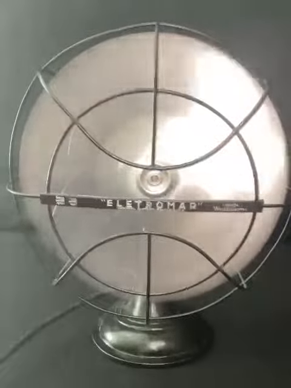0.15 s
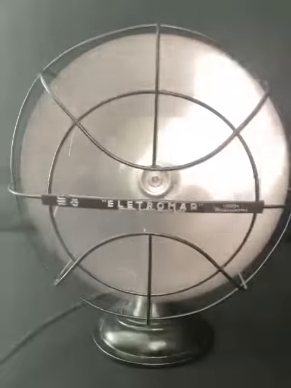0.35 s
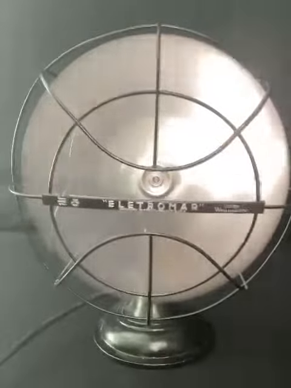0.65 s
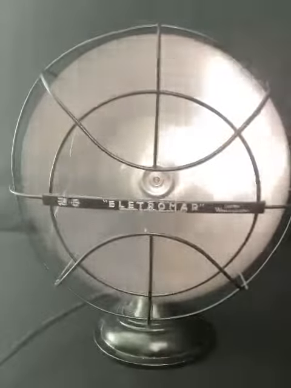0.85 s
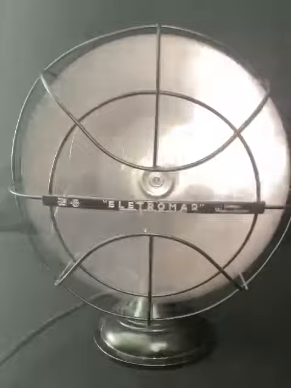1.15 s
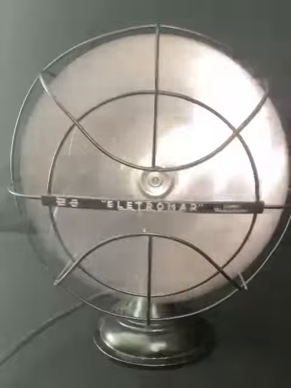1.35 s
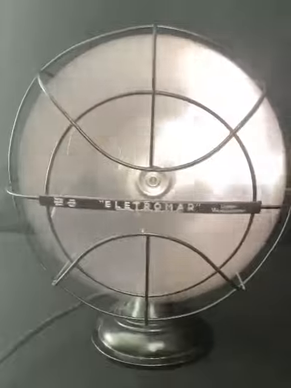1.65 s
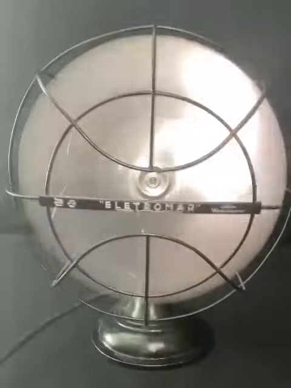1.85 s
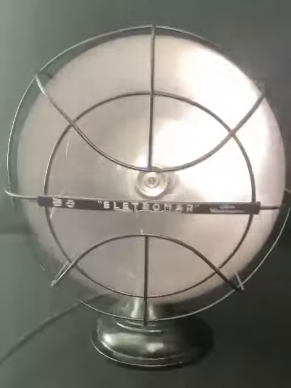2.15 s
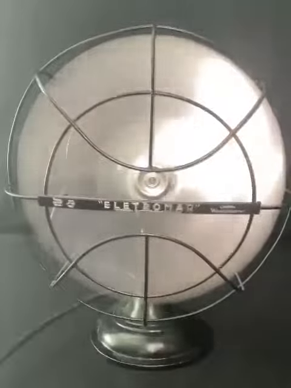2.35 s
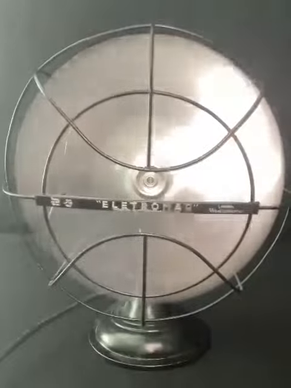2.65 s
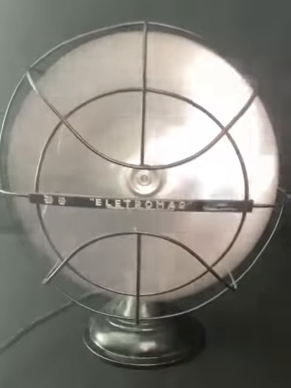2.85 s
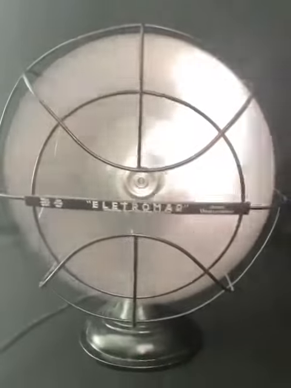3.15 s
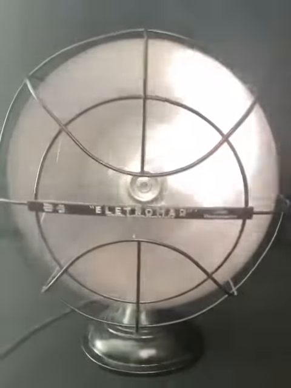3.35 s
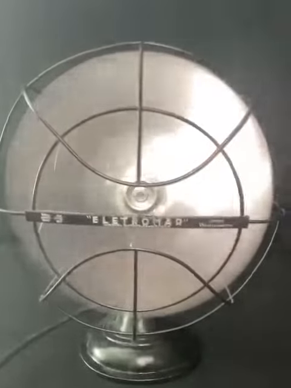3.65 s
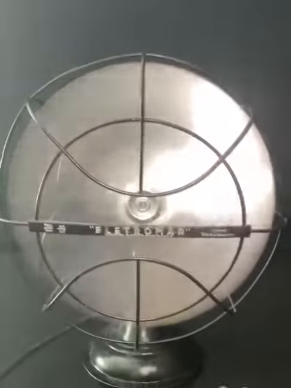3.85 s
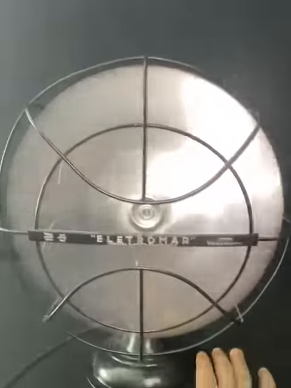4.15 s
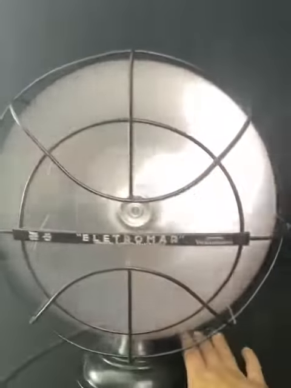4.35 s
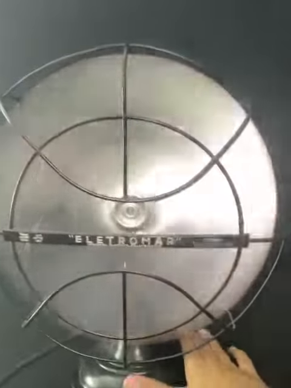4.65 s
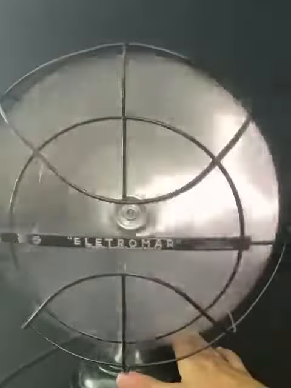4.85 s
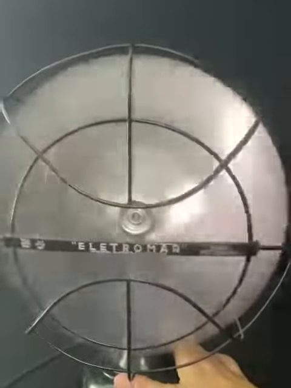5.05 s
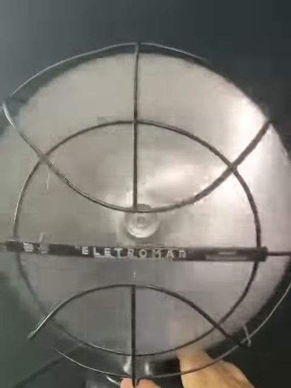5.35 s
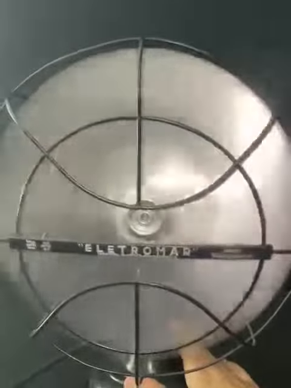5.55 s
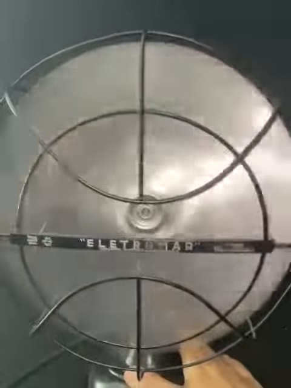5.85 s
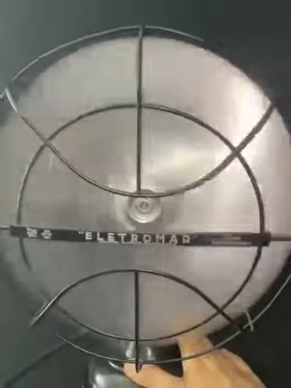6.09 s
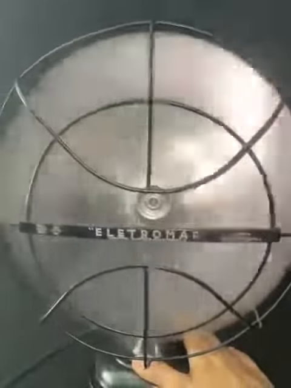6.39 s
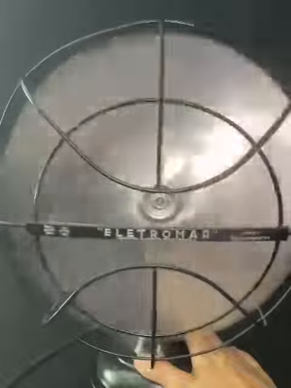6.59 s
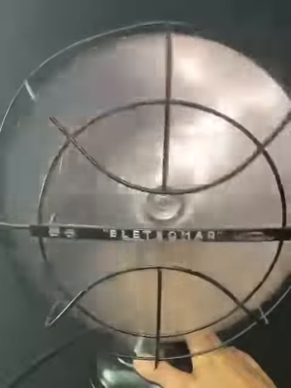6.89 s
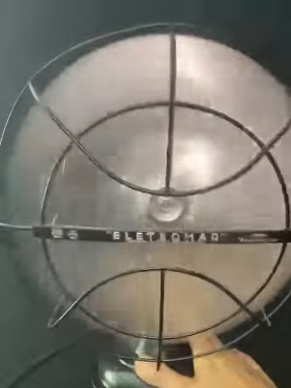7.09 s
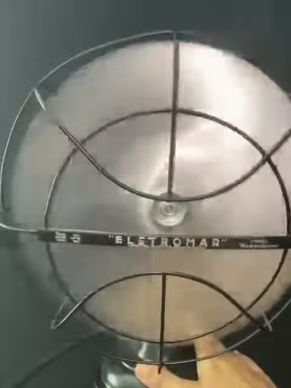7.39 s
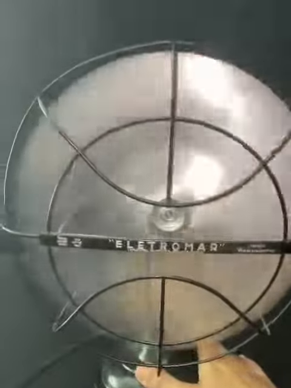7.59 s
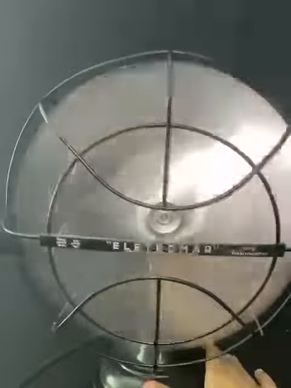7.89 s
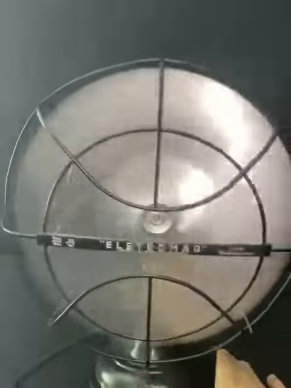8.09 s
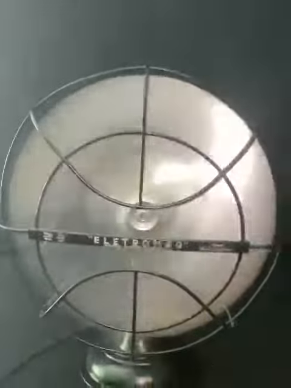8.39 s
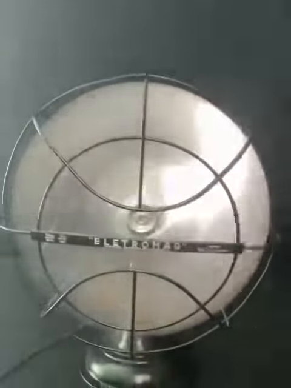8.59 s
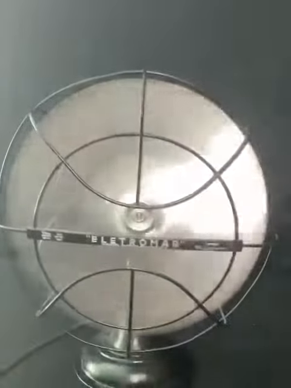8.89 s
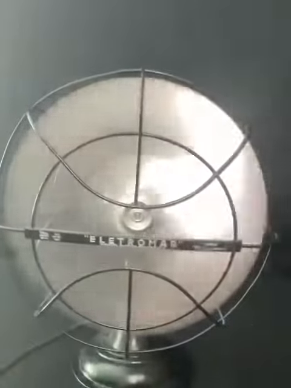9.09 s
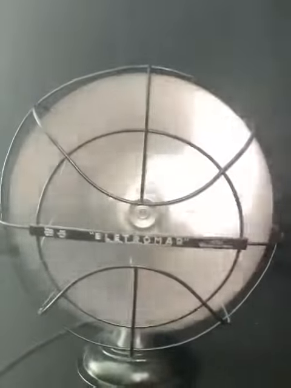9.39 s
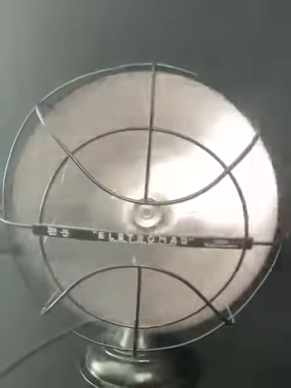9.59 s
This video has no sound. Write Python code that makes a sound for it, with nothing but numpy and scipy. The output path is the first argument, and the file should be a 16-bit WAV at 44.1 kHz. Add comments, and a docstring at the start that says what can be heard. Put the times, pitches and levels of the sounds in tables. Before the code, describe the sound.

An old metal desk fan drones and rattles close up, its wire guard ringing, then is switched off and coasts down, scraping more softly.

```python
"""In a small room, an old metal desk fan runs close to a stereo microphone, is switched off after six seconds and coasts.
Its unbalanced rotor shakes the frame in sine lines at multiples of the shaft rate, beside a magnetic drone.
The wire guard sings in wavering modes and rattles in bouts of noise; the dry bearing scrapes once a turn.
Air rushes off the blades as coloured noise, and its draught buffets the microphone in rumble and single puffs."""
import sys
import numpy as np
from scipy import signal
from scipy.fft import rfft, irfft, next_fast_len
from scipy.io import wavfile
from scipy.ndimage import uniform_filter1d

SR = 44100
rng = np.random.default_rng(int(sys.argv[2]) if len(sys.argv) > 2 else 0)


def dump(signal):
    """Clip the signal to [-1, 1] and save it as 16-bit WAV at the path in sys.argv[1]."""
    limited = np.clip(np.atleast_2d(signal).T, -1, 1)
    pcm = np.round(limited * 32767).astype(np.int16)
    wavfile.write(sys.argv[1], SR, pcm)


N = 429093
TIME = np.arange(N) / SR

# rotor speed: (time [s], speed [turns/s])
SPEED = [(0.0, 40.005), (1.0, 40.317), (1.5, 40.541), (2.2, 40.632), (3.4, 40.868), (4.6, 40.947),
         (5.5, 40.935), (6.1, 40.853), (6.3, 39.698), (6.6, 37.611), (7.0, 36.208), (7.5, 33.568),
         (8.0, 31.492), (8.5, 29.54), (9.0, 28.445), (9.73, 25.859)]
# the stand's response to the throb at twice the shaft rate: (frequency [Hz], level [dB])
THROB = [(52, -48), (60.5, -51), (62.6, -33), (64.8, -29.5), (68, -32), (72, -32.5), (82, -36.5)]
# resonances of the body: (frequency [Hz], width [Hz], level before the order strengths [dB])
BODY = [(39.6, 4, -39.6), (86, 7, -43), (114.7, 3.6, -36.5), (149.9, 15, -35.5), (197, 5, -33),
        (216.9, 6, -32.3), (244.5, 16, -32), (291, 6, -37.5), (327, 24, -47.3), (362.8, 10.5, -37.5),
        (397.5, 15.8, -43), (424.9, 11.4, -39), (468.3, 10.5, -43), (516.5, 11, -28.5),
        (602.8, 11.6, -41.6)]
# strength of the unbalance at multiples of the shaft rate: (multiple [1], relative level [dB])
ORDERS = [(1, 0), (3, 6.5), (4, -1), (5, 1), (6, -3.5), (7, -4), (8, -.5), (9, -1.5), (12, -1), (13, -3.5),
          (14, 1.5), (19, 1.5)]
# the motor's magnetic pull pulses at twice the mains rate
PULL_HZ = 120
# the motor's drive ends here and dies away with this time constant
DRIVE_ENDS_S, DRIVE_FADE_S = 6.31, 0.22
# level of the frame's drone: (time [s], level [dB])
DRONE = [(0, -25.5), (.95, -30), (1.1, -31), (1.8, -29), (5.3, -27.5), (5.7, -25.5), (6.3, -28.5)]
# drone lines, the pull shifted up by 0, 1 and 2 times the shaft rate: (relative level [dB])
DRONE_LINES = [-19, -16, 0.3]
# a hand steadies the base: (time [s], grip [0-1])
HAND = [(0, 0), (4.1, 0.05), (4.5, 0.81), (7.2, 1), (8.1, 0.2)]
# overall shaking of the guard: (time [s], singing [dB], rattle [dB]), before bouts and trims
SHAKING = [(0, -45, -33), (0.3, -33, -33.5), (0.8, -26.5, -38), (1.15, -25.5, -36), (1.6, -28, -37.5),
           (2.4, -27, -36.5), (3.2, -25, -33.5), (3.65, -29, -34), (3.9, -21, -31.5), (4.12, -21.5, -35.5),
           (4.3, -20, -33), (4.7, -23, -32.5), (5.05, -17, -34), (5.45, -23, -30.5), (5.75, -22, -30.5),
           (5.95, -22, -34.5), (6.15, -22, -29), (6.3, -27, -33), (6.45, -27, -33.5), (6.85, -29.5, -38),
           (7.2, -35.5, -40), (7.6, -41, -43), (8.55, -65, -46), (9.15, -52, -44.5), (9.73, -58, -49)]
# one bout of shaking, a slow beat of shaft against pull: (share of the beat [0-1], singing [dB], rattle [dB])
BOUT = [(0, -4.5, .8), (.1, -1.5, 2.2), (.25, 0.3, 1.2), (.6, 0.8, -1), (.78, -1.5, -2.6),
        (.92, -5.5, -1.8), (1, -4.5, .8)]
# singing modes of the guard: (pitch [Hz])
SINGING_HZ = [441, 512, 522.7, 542, 603, 605.5, 651, 848, 1054, 1129.5, 1168, 1211, 1686, 1714, 2390, 2592,
              2645, 2729]
# the same modes: (relative level [dB], share driven by singing rather than rattle [0-1],
# pitch wander [Hz], change under the hand [dB])
SINGING = [(-21.5, 0.72, 2.3, -3.5), (-18, 0.9, 5.07, 9.5), (0.5, 0.99, 1.582, -0.5),
           (-16.5, 0.36, 4.985, 8.5), (-13, 0.75, 1.52, 0.5), (-13, 0.65, 1.52, 0), (-19, 0.54, 1.88, -13),
           (-24.5, 0.25, 1.51, -11), (-16, 0.071, 1.09, -6), (-29, 0.66, 1.1, 14), (-27, 0.15, 2.37, -2),
           (-29.5, 0.6, 1.6, 10.5), (-21, 0.49, 2, 1), (-23.5, 0, 1.96, 3), (-19, 0.14, 3, -8),
           (-23.5, 0.67, 2.92, -7), (-26, 0.2, 3.03, -7), (-30.5, 0, 3.6, -1)]
# how the singing leans to one side: (time [s], left minus right [dB])
LEAN = [(3.3, -1.5), (4.3, 2.5), (6.3, 2), (8, 0.5)]
# chatter of the guard, a knock and its rebound: (share of the turn [0-1], relative level [dB])
CHATTER = [(0, -3.5), (.12, -4), (.16, 1.2), (.27, 3), (.45, -.7), (.6, .7), (.72, -2.5), (1, -3.5)]
# hard knocks of the guard: (time [s], onset level before the knock trim [dB])
KNOCKS = [(1.47, -24.5), (1.4965, -28), (2.135, -25.5), (2.2542, -30), (2.577, -23.5), (2.6264, -21.5),
          (2.6535, -27), (2.6755, -25), (6.0282, -25), (6.079, -27), (6.127, -23)]
# tone of the rattle: (frequency [Hz], density [dB/Hz])
RATTLE = [(450, -18), (620, 2.5), (750, -11), (960, 1), (1200, -3), (1420, -10.5), (1700, -1.5),
          (1850, -7.5), (2080, -2.5), (2230, -5.5), (2600, -2), (2900, -12), (3500, -20.5), (6000, -36)]
# level of the bearing's scrape: (time [s], level before bouts and trim [dB])
SCRAPING = [(0, -37.5), (3.5, -37), (5.6, -36), (7.35, -43.5), (8.05, -39), (8.45, -47.5), (8.8, -48.0),
            (9.05, -42.5), (9.73, -52)]
# pressure on the bearing: (share of the turn [0-1], relative level [dB])
RUB = [(0, -8), (.06, -4), (.13, 3), (.22, -1), (.3, -1.8), (.45, -3.2), (.65, -4.8), (.8, -6.5), (1, -7.2)]
# how much the bearing's strokes deepen as the rotor loses its speed
STROKE_DEEPENING = 1.7
# rings of the bearing housing: (frequency [Hz], width [Hz], level over the scrape [dB])
HOUSING = [(3106, 28, 14.5), (4950, 59, -12), (6140, 220, -2), (6435, 38, 7.5), (6650, 33, -11),
           (8600, 22, 15.5), (11330, 190, 0)]
# tone of the scrape: (frequency [Hz], density [dB/Hz])
SCRAPE = [(1500, -6.5), (3000, -12), (3600, -13.5), (4700, -3.5), (5300, -4.5), (6250, 1), (7200, -5),
          (8100, -5.5), (9200, -4.5), (9900, -6.5), (11200, 0.5), (11700, -18), (12300, -43)]
# stray ticks of the bearing: (time [s], onset level [dB])
TICKS = [(5.757, -36), (5.82, -39), (6.351, -28), (7.07, -27), (7.7455, -30), (7.901, -31), (7.9954, -30),
         (8.0263, -29), (8.756, -37), (9.3294, -36), (9.5479, -45), (9.664, -38)]
# tone of a tick: (frequency [Hz], density [dB/Hz])
TICK = [(1500, -18), (3500, -15), (6000, 6), (8000, 7), (11000, -7), (12300, -22)]
# rings of the rotor's rasp at its critical speed: (frequency [Hz], width [Hz], relative level [dB])
RASP = [(2584, 28, -7), (3230, 100, -13.5)]
# the base rocks and taps the table as the rotor slows: (time [s], peak level [dB])
TAPS = [(6.975, -15), (7.003, -16), (7.031, -20), (7.058, -14.5)]
# air rush: level at full speed before its trim, growth per tenfold speed, extra with a hand in the stream
AIR_DB, AIR_SPEED_DB, AIR_HAND_DB = -35.5, 76.5, 3.5
# tone of the rush: (frequency [Hz], density [dB/Hz])
RUSH = [(40, -7), (100, -0.5), (200, 0), (300, -5), (420, -3.5), (480, 2), (520, 7), (570, 0), (720, -11),
        (1500, -15.5), (4000, -14), (12000, -30.5)]
# draught on the microphone: (time [s], level before gusts and low cut [dB])
DRAUGHT = [(0, -31.5), (.8, -54), (1.6, -42), (2.4, -46), (2.7, -29.5), (3.4, -30), (4.4, -33.5),
           (5.2, -28.5), (5.75, -47), (6.45, -25.5), (6.9, -30.5), (7.4, -34.5), (8.3, -42.5), (8.6, -39),
           (9, -54), (9.73, -47)]
# tone of the draught: (frequency [Hz], density [dB/Hz])
BUFFET = [(15, -31), (30, -31), (45, -3.5), (62, 2), (85, -5.5), (130, -9.5), (200, -9.5), (350, -22),
          (900, -80)]
# single puffs on the microphone: (time [s], peak level before the low cut [dB], pitch [Hz])
PUFFS = [(0.053, -15.5, 79), (0.33, -21, 70), (1.15, -12.5, 95.5), (1.703, -13, 69), (2.648, -18, 69.5),
         (2.762, -12, 67), (2.832, -14, 78), (2.866, -18, 240), (2.888, -14.5, 74), (3.186, -16, 62),
         (3.312, -17, 75), (3.334, -15, 66), (3.392, -15, 70), (3.51, -20, 70), (3.69, -16, 60),
         (4.08, -14, 73), (4.265, -13, 75), (4.551, -15, 82), (4.776, -18, 70), (4.852, -11.5, 64),
         (5.081, -16, 73.4), (5.197, -11.5, 97), (5.49, -12, 95), (6.083, -19, 78), (6.229, -16, 68),
         (6.35, -12, 77), (6.489, -13, 52), (6.875, -17, 97), (8.554, -23, 77), (9.49, -33, 50.4)]
# slow air stirring separately round each port: (time [s], level [dB])
STIRRING = [(0, -65), (2.5, -66), (5.5, -60), (6.7, -61), (8, -33.5), (9, -62), (9.73, -67)]
# tone of the stirring: (frequency [Hz], density [dB/Hz])
STIR = [(15, -12), (30, -6), (70, 5.5), (130, 2), (260, -4), (420, -9), (800, -52)]
# phase between the two microphone ports: (frequency [Hz], left lead [rad])
PORTS = [(20, 0), (400, -.1), (520, -.75), (620, -1.4), (720, -1.2), (800, -.1), (1050, -.3), (1130, .7),
         (1300, -.1), (2200, 0), (2700, -.9), (3400, -2.4), (3900, -2.4), (4200, 1.9), (4600, 1.7),
         (4900, 0), (5500, .1), (6300, 1.8), (7000, 3), (8500, 3.2), (9200, 3.8), (9700, 6.2),
         (11500, 6.28)]
# part of scrape and rush that reaches the two ports unrelated: (frequency [Hz], share [0-1])
STRAY = [(2000, 0), (2600, 0.1), (3000, 0.32), (4500, 0.72), (4950, 0), (5500, 0), (6000, 0.3), (6600, 0),
         (7100, 0), (8300, 0), (9400, 0.16), (10000, 0), (12000, 0)]
# upper edge of the microphone's band
TOP_HZ = 11900


def undb(db):
    """Decibels to gain."""
    return np.exp(np.asarray(db) * (np.log(10) / 20))


def unit(x):
    """Scale to rms 1."""
    return x / np.sqrt(np.mean(x ** 2))


def curves(rows):
    """Each column of a table, joined by straight lines in time."""
    s, *columns = np.transpose(rows)
    return [np.interp(TIME, s, column) for column in columns]


def across(points, hz):
    """Read a spectrum on a log-frequency axis."""
    f, value = np.transpose(points)
    return np.interp(np.log(np.maximum(hz, 1)), np.log(f), value)


def filtered(x, response):
    """Apply a frequency response given as a function of Hz."""
    size = next_fast_len(N + 4096, real=True)
    hz = np.arange(size // 2 + 1) * SR / size
    return irfft(rfft(x, size) * response(hz), size)[:N]


def colour(x, points):
    """Give a sound a spectrum, at rms 1."""
    return unit(filtered(x, lambda hz: undb(across(points, hz))))


def resonances(modes, hz):
    """Gain of a set of resonances at the given frequencies."""
    power = 0
    for f, width, db in modes:
        detuning = (hz - f) / (width / 2)
        power = power + undb(db) ** 2 / (1 + detuning ** 2) ** 1.206
    return np.sqrt(power)


def ringing(x, modes):
    """Let a sound ring in damped modes, each a simple resonance of given width."""
    return filtered(x, lambda hz: sum(undb(db) / (1 + 2j * (hz - f) / width) for f, width, db in modes))


def noise():
    """White noise."""
    return rng.standard_normal(N)


def walk(rate):
    """Smooth random drift with spread 1; rate in steps per second."""
    k = int(SR / rate)
    steps = np.repeat(rng.standard_normal(N // k + 1), k)
    return unit(uniform_filter1d(steps, k)[:N])


def each_turn(turns):
    """One random value held through each turn."""
    return rng.standard_normal(1024)[turns.astype(int)]


def drive():
    """Share of the motor's drive: full, then dying away after the switch-off."""
    return np.exp(-np.maximum(TIME - DRIVE_ENDS_S, 0) / DRIVE_FADE_S)


def shaft(turns, speed, softening_db=8.5, trim_db=0.1):
    """Unbalance shakes the body at multiples of the shaft rate; lines swell as they slide through resonances."""
    out = undb(across(THROB, 2 * speed)) * np.sin(4 * np.pi * turns)
    # a slower rotor bumps more softly: high multiples go first
    soft_db = softening_db * np.log10(speed / speed.max())
    # lines waver more as the rotor slows
    waver_db = 1.6 + 4 * (1 - speed / speed.max())
    grid = np.arange(1000)
    body = resonances(BODY, grid)
    for k in [1, *range(3, 20)]:  # the throb is the second multiple
        order_db = np.interp(k, *np.transpose(ORDERS))
        db = order_db + k * soft_db + trim_db + waver_db * walk(9)
        line = np.sin(2 * np.pi * (k * turns + rng.random()))
        out = out + np.interp(k * speed, grid, body) * undb(db) * line
    return np.sqrt(2) * out


def drone(turns, waver_db=0.0):
    """The magnetic pull, shifted up by multiples of the shaft rate, makes the frame drone."""
    db = curves(DRONE)[0] + waver_db * walk(7.2)
    lines = 0
    for k, line_db in enumerate(DRONE_LINES):
        lines = lines + undb(line_db) * np.sin(2 * np.pi * (PULL_HZ * TIME + k * turns))
    return np.sqrt(2) * undb(db) * drive() * lines


def bouts(turns, sing_waver_db=1.0, rattle_waver_db=0.74, hand_steadying=0.42):
    """Three times the shaft rate beats against the pull: bouts quicken as the rotor gains speed."""
    beat = (3 * turns - PULL_HZ * TIME) % 1
    share, sing_db, rattle_db = np.transpose(BOUT)
    loose = 1 - hand_steadying * curves(HAND)[0]  # the hand evens out the rattle
    sing_bout_db = drive() * np.interp(beat, share, sing_db) + sing_waver_db * walk(15)
    rattle_bout_db = drive() * loose * np.interp(beat, share, rattle_db) + rattle_waver_db * walk(14)
    return sing_bout_db, rattle_bout_db


def singing(turns, speed, sing_db, rattle_db, rattle_lead_db=5.5, speed_db=35, trim_db=-1.13,
            throb=0.16, flutter_db=3.5, steady_db=0.9):
    """Guard wires ring on, topped up once a turn; loosely driven modes flutter and the hand shifts their balance."""
    out, grip = 0, curves(HAND)[0]
    knocking_db = rattle_db + rattle_lead_db + speed_db * np.log10(speed / speed.max())
    for hz, (mode_db, share, wander_hz, hand_db) in zip(SINGING_HZ, SINGING):
        phase = np.cumsum(hz + wander_hz * walk(14)) / SR
        drive_db = share * sing_db + (1 - share) * knocking_db
        waver_db = steady_db + flutter_db * np.sqrt(max(1 - share, 0))
        own_db = mode_db + hand_db * grip + waver_db * walk(12)
        out = out + undb(drive_db + own_db) * np.sin(2 * np.pi * phase)
    top_up = 1 + throb * np.cos(2 * np.pi * (turns - .4))
    return np.sqrt(2) * undb(trim_db) * out * top_up


def rattle(turns, db, scatter_db=2.0, limp_db=1.2, trim_db=-2.5, knock_db=-5.0, knock_s=0.0053):
    """The loose guard knocks once a turn, strong and weak by turns, rebounds and chatters until the next knock."""
    knock = turns + .88  # counts up just before each knock
    force_db = scatter_db * each_turn(knock) + limp_db * (-1) ** knock.astype(int)
    shape = undb(np.interp(turns % 1, *np.transpose(CHATTER)))
    floor = shape.min()
    size = undb(db + trim_db) * unit(floor + undb(force_db) * (shape - floor))
    for s, onset_db in KNOCKS:
        size = size + undb(onset_db + knock_db) * (TIME >= s) * np.exp(-np.abs(TIME - s) / knock_s)
    return size * colour(noise(), RATTLE)


def bearing(turns, speed, db, scatter_db=1.22, grit_db=1.5, trim_db=2.0, dulling_db=11, dull_hz=8000):
    """The dry bearing scrapes on one side of each turn; slower strokes stand apart and grow duller."""
    slowed = 1 - speed / speed.max()
    rub_db = np.interp(turns % 1, *np.transpose(RUB))
    stroke_db = (1 + STROKE_DEEPENING * slowed) * (rub_db - rub_db.mean())
    stroke = undb(stroke_db + scatter_db * each_turn(turns) + grit_db * walk(1500))
    # keep the quarter-second level even, so only the strokes show
    friction = noise() * stroke / np.sqrt(uniform_filter1d(stroke ** 2, size=SR // 4))
    scrape = colour(friction + ringing(friction, HOUSING), SCRAPE)
    top = filtered(scrape, lambda hz: 1 - 1 / (1 + (hz / dull_hz) ** 10))
    lower = (scrape - top) * undb(.5 * dulling_db * slowed)
    return undb(db + trim_db) * (lower + top * undb(-dulling_db * slowed))


def rasp(speed, critical=28, spread=1.0, db=-45):
    """A thin metallic rasp swells and fades as the rotor slows through a critical speed (turns/s)."""
    swell = np.exp(-((speed - critical) / spread) ** 2)
    return undb(db) * swell * unit(ringing(noise(), RASP))


def ticks(decay_s=0.0098):
    """Now and then the bearing catches with a short bright tick of decaying noise."""
    size = sum(undb(db) * (TIME >= s) * np.exp(-np.abs(TIME - s) / decay_s) for s, db in TICKS)
    return size * colour(noise(), TICK)


def taps(hz=190, decay_s=0.0031, rise_s=0.00098):
    """Dull, quickly damped taps of the rocking base on the table."""
    out = 0
    for s, db in TAPS:
        age = np.clip(TIME - s, -.05, .05)
        swell = np.exp(-np.abs(age) / np.where(age < 0, rise_s, decay_s))
        out = out + undb(db) * swell * np.cos(2 * np.pi * hz * age)
    return out


def air(turns, db, swirl_db=2.5, chop=0.026, trim_db=2):
    """Turbulence leaves the blades in uneven swirls, chopped slightly once a turn."""
    eddies = noise() * undb(swirl_db * walk(18)) * (1 + chop * np.sin(2 * np.pi * turns))
    return undb(db + trim_db) * colour(eddies, RUSH)


def draught(gust_db=3.0, trim_db=0.0, puff_db=0.0, rise_cycles=0.52, fall_cycles=0.74, low_cut_hz=36):
    """Moving air rumbles on the microphone, with distinct puffs that rise fast and last about one cycle."""
    out = undb(curves(DRAUGHT)[0] + trim_db + gust_db * walk(22)) * colour(noise(), BUFFET)
    for s, db, hz in PUFFS:
        near = np.abs(TIME - s) < .1
        cycles = hz * (TIME[near] - s)
        swell = np.exp(-(cycles / np.where(cycles < 0, rise_cycles, fall_cycles)) ** 2)
        out[near] -= undb(db + puff_db) * swell * np.cos(2 * np.pi * cycles)
    return filtered(out, lambda hz: 1 - 1 / (1 + (hz / low_cut_hz) ** 6))


def bump(s=3.111, db=-8, hz=165, sag_s=0.01, rise_s=0.0046, fall_s=0.012):
    """One heavy thump on the microphone, whose pitch drops as it dies."""
    age = np.clip(TIME - s, -.1, .1)
    cycles = hz * sag_s * (1 - np.exp(-age / sag_s))
    swell = np.exp(-(age / np.where(age < 0, rise_s, fall_s)) ** 2)
    return -undb(db) * swell * np.cos(2 * np.pi * cycles)


def stray_share(hz):
    """Share of the power that is opposite at the two ports."""
    return np.clip(across(STRAY, hz), 0, 1) / 2


def room(x, t60_s=0.085, damp_hz=4800):
    """A diffuse, dull tail from the walls of a small room: decaying noise, low-passed."""
    age = TIME[:SR // 2]
    tail = rng.standard_normal(len(age)) * np.exp(-np.log(1000) * age / t60_s) * (age > .005)
    wet = signal.fftconvolve(x, tail / np.linalg.norm(tail))[:N]
    return signal.sosfilt(signal.butter(2, damp_hz, fs=SR, output="sos"), wet)


def scene(room_db=-12, clatter_room_db=-14, wind_side_db=-12, bout_in_bearing=0.38, bout_in_modes=0.79):
    """The fan reaches the two ports out of step; the room and stray eddies differ from side to side."""
    speed, = curves(SPEED)
    turns = np.cumsum(speed) / SR + .96
    sing_bout_db, rattle_bout_db = bouts(turns)
    sing_db, rattle_db = np.array(curves(SHAKING)) + [sing_bout_db, rattle_bout_db]
    scrape_db = curves(SCRAPING)[0] + bout_in_bearing * rattle_bout_db
    air_db = AIR_DB + AIR_SPEED_DB * np.log10(speed / speed.max()) + AIR_HAND_DB * curves(HAND)[0]

    hum = shaft(turns, speed) + drone(turns) + taps()
    song = singing(turns, speed, sing_db, rattle_db + bout_in_modes * rattle_bout_db)
    clatter = rattle(turns, rattle_db) + rasp(speed)
    hiss, other_hiss = (bearing(turns, speed, scrape_db) + air(turns, air_db) for _ in range(2))
    shared_hiss = filtered(hiss, lambda hz: np.sqrt(1 - stray_share(hz)))
    stray = filtered(other_hiss, lambda hz: np.sqrt(stray_share(hz)))
    rough = shared_hiss + clatter + ticks()
    # the wide guard throws its clatter at the walls in all directions
    to_walls = undb(room_db) * rough + undb(clatter_room_db) * clatter
    wind = draught() + bump()
    eddies = undb(curves(DRAUGHT)[0] + wind_side_db) * colour(noise(), BUFFET)

    channels = []
    for side in (1, -1):  # left, right
        fan = hum + rough + side * stray + song * undb(side * curves(LEAN)[0] / 2)
        direct = filtered(fan, lambda hz: np.exp(.5j * side * across(PORTS, hz)))
        stir = undb(curves(STIRRING)[0]) * colour(noise(), STIR)
        channels.append(direct + room(to_walls) + wind + side * eddies + stir)
    return np.array(channels)


def record(dry):
    """The microphone cuts the top with a steep low-pass."""
    return signal.sosfilt(signal.ellip(10, .2, 80, TOP_HZ, fs=SR, output="sos"), dry)


dry = scene()
out = record(dry)
dump(out)
```